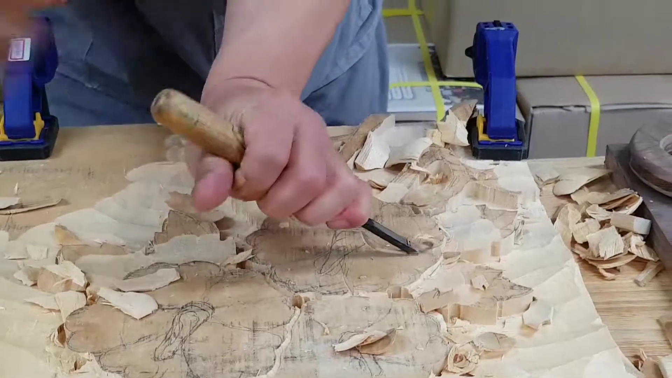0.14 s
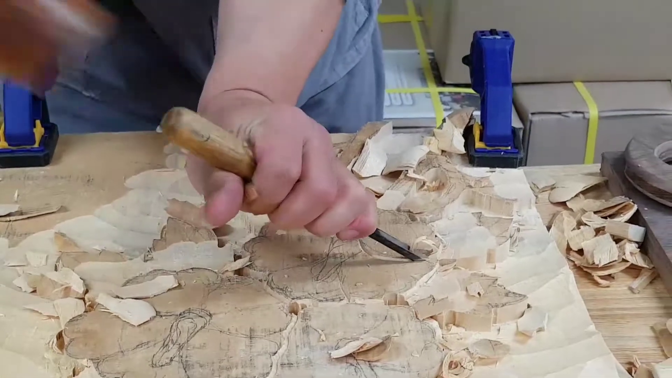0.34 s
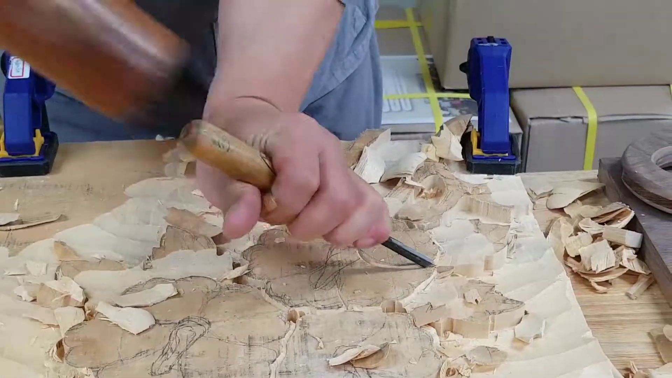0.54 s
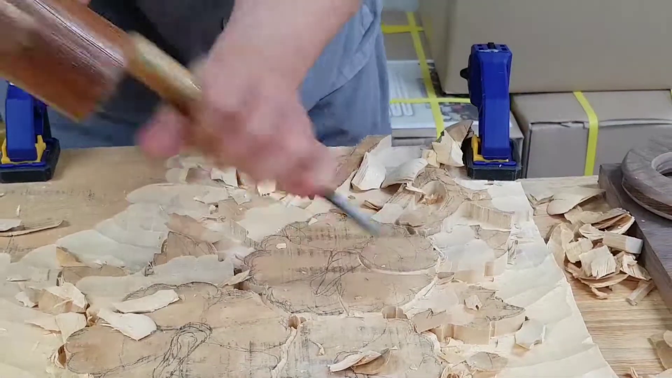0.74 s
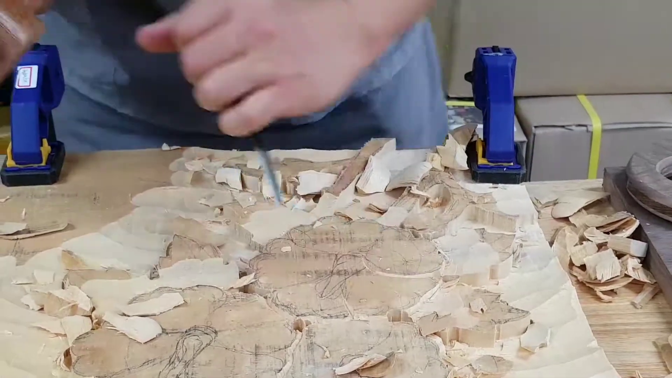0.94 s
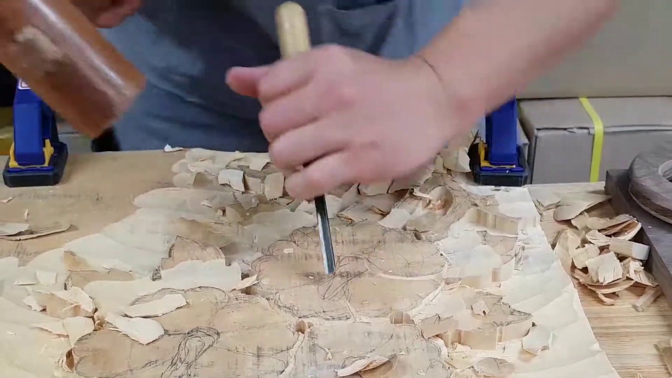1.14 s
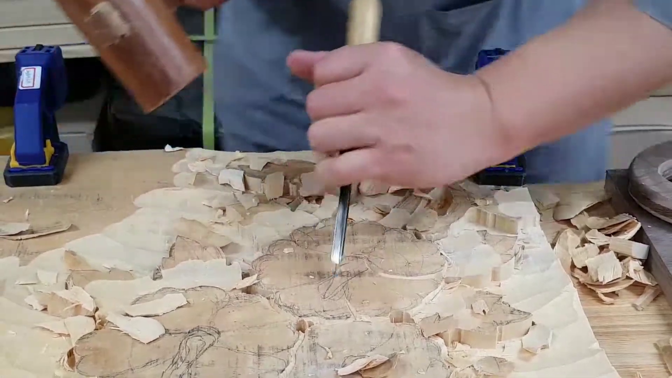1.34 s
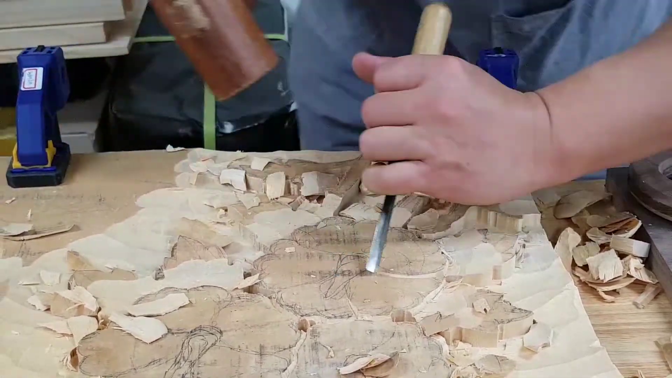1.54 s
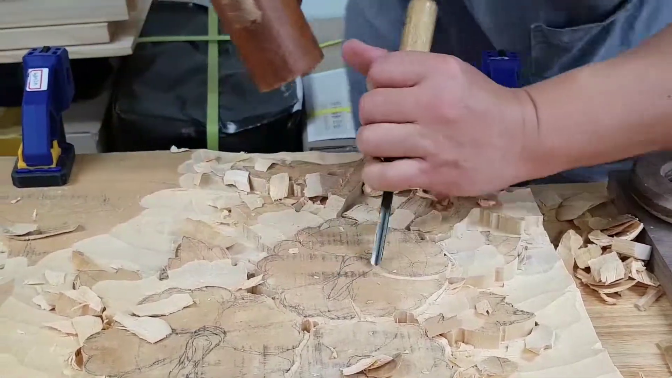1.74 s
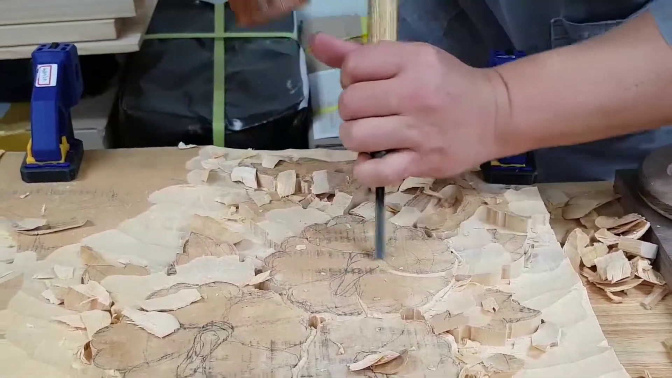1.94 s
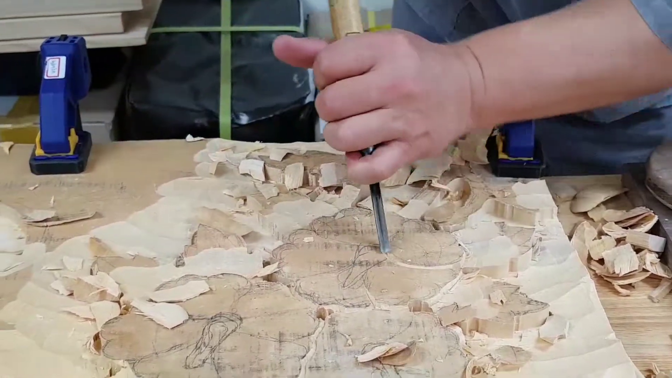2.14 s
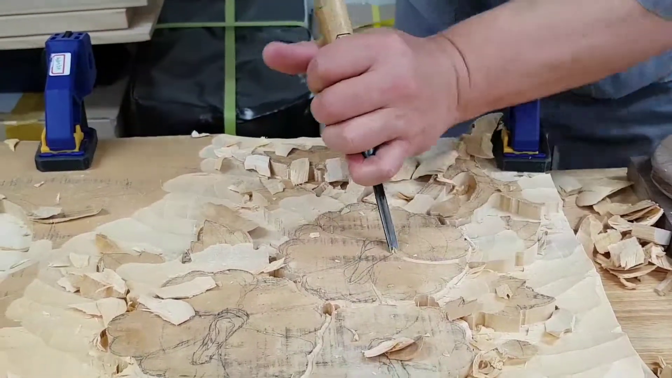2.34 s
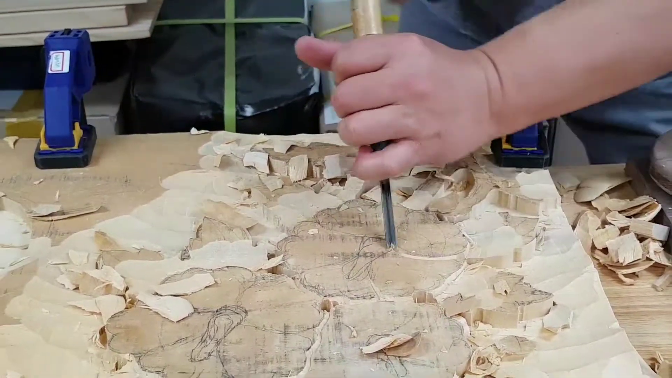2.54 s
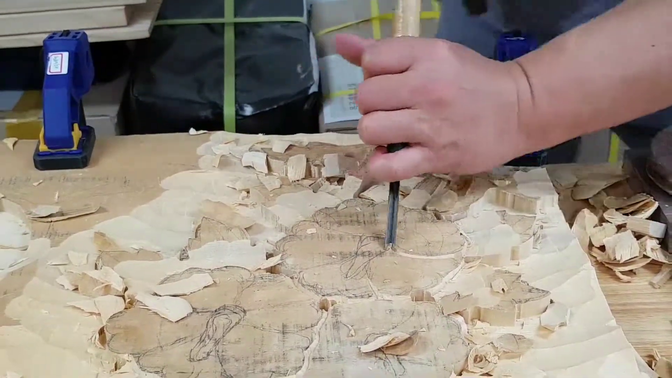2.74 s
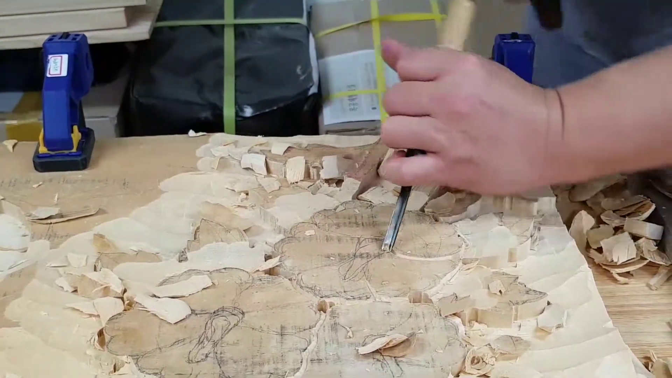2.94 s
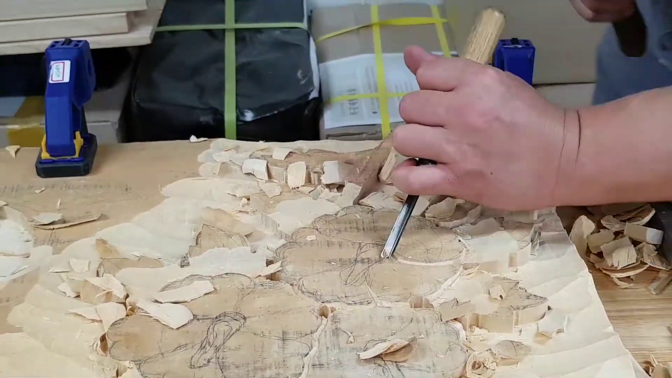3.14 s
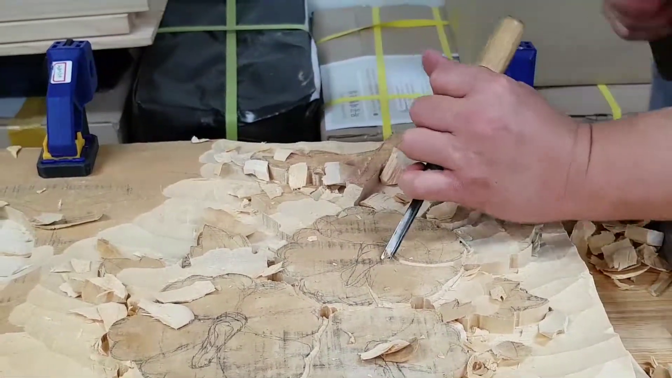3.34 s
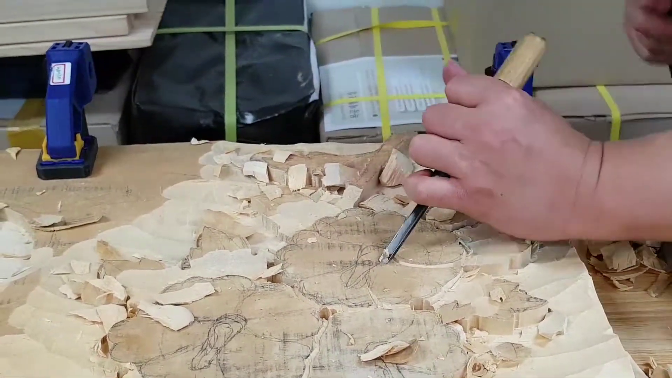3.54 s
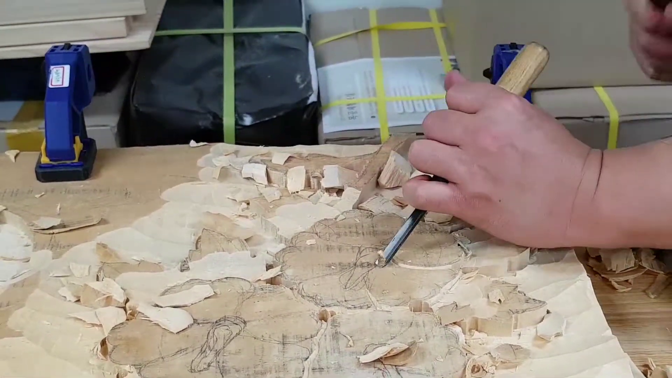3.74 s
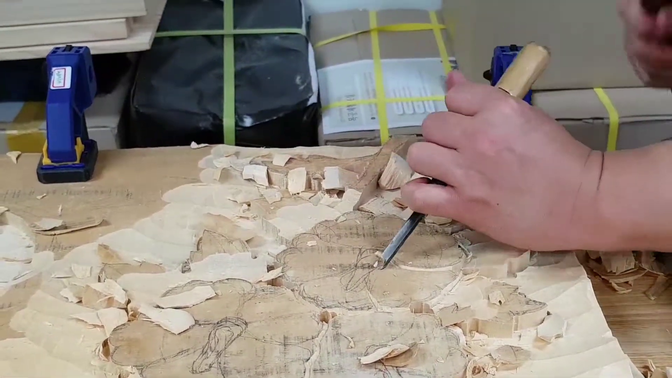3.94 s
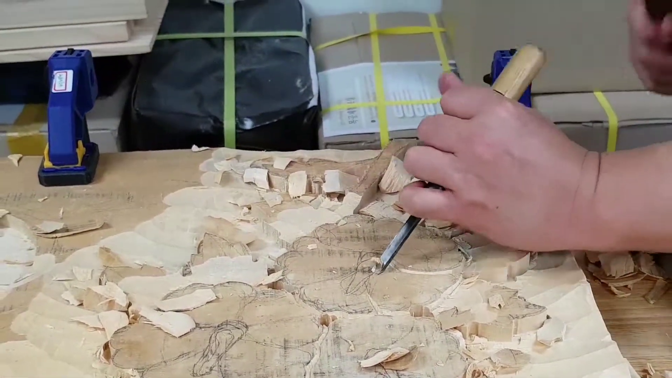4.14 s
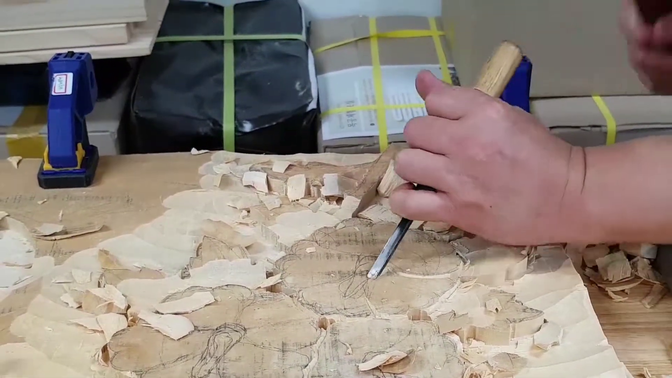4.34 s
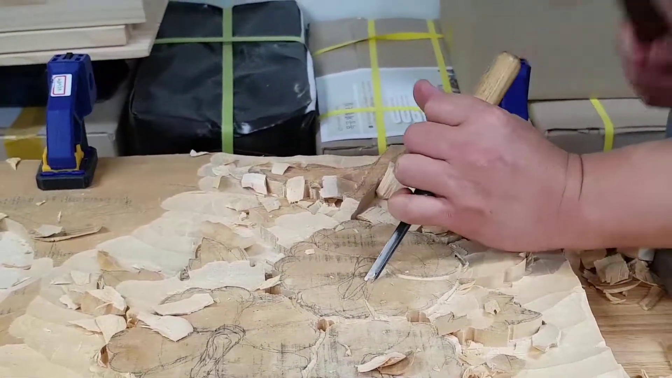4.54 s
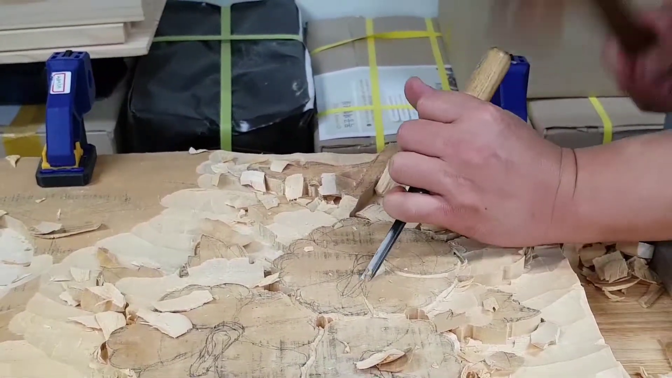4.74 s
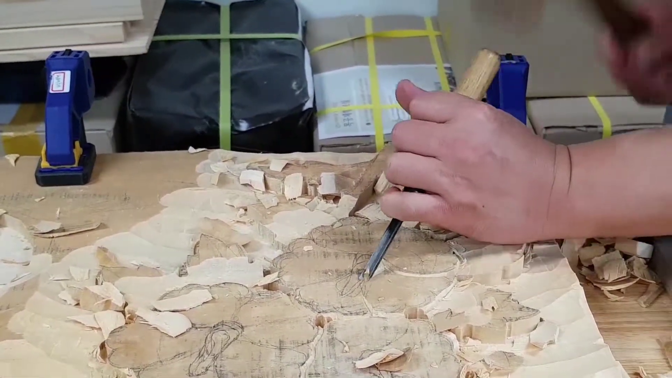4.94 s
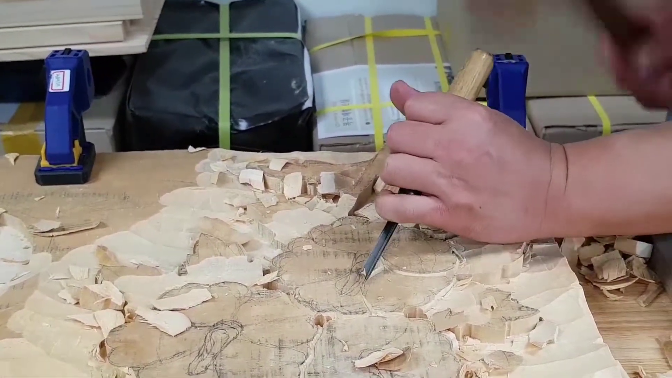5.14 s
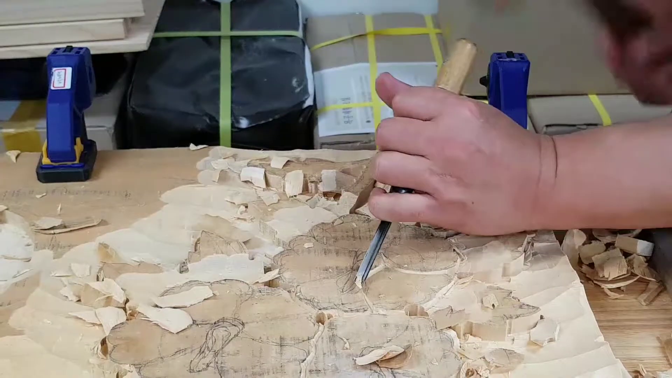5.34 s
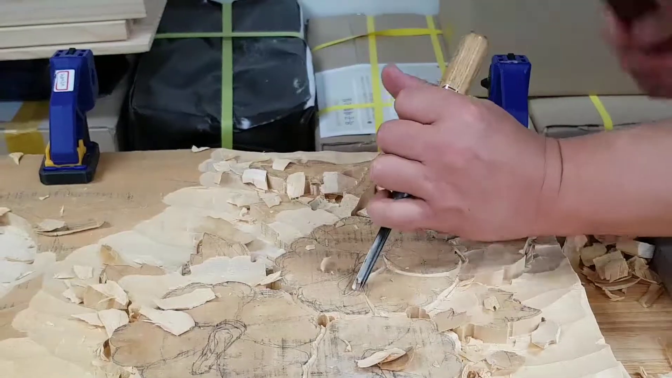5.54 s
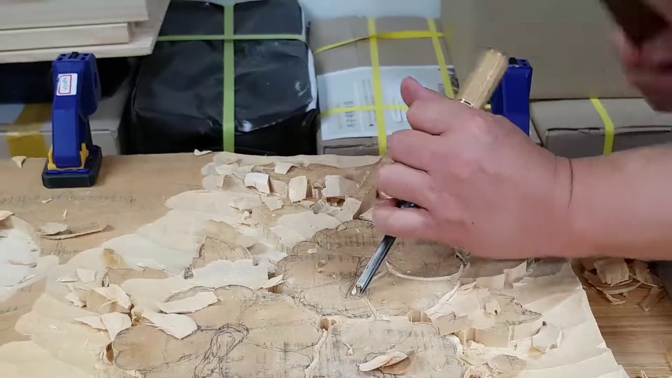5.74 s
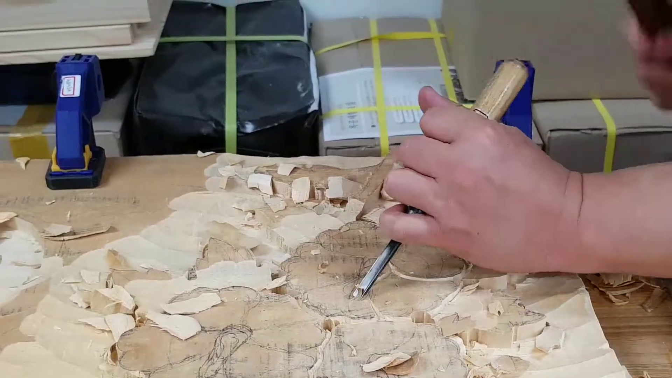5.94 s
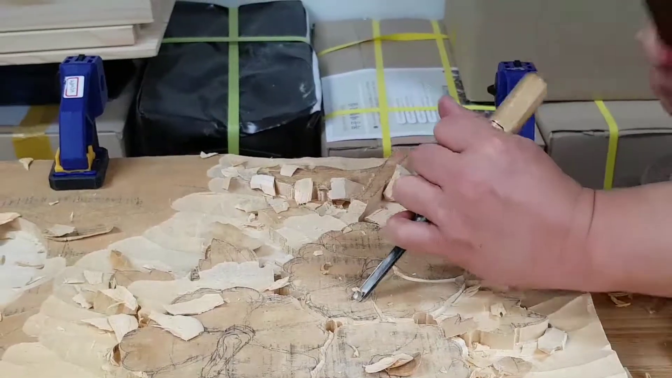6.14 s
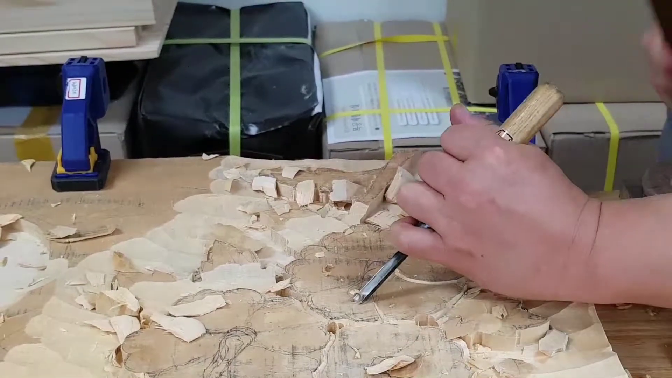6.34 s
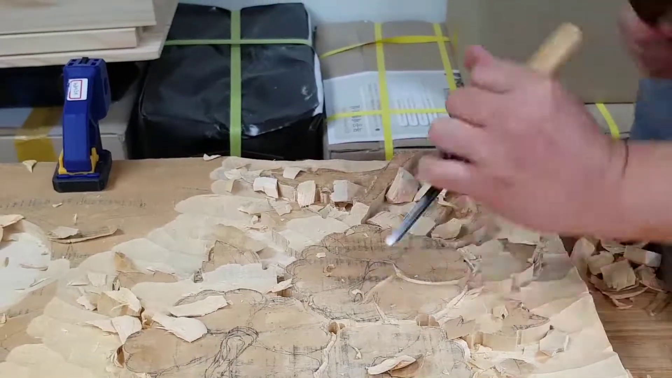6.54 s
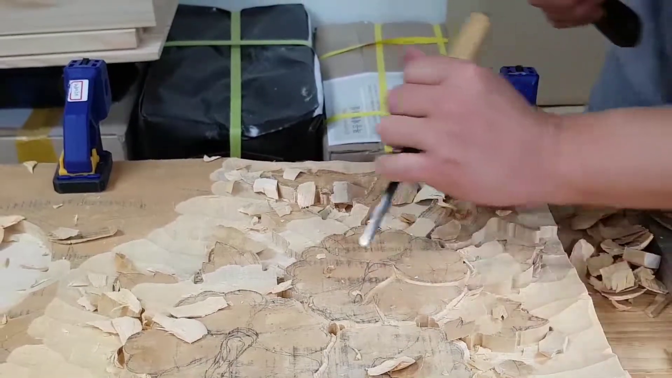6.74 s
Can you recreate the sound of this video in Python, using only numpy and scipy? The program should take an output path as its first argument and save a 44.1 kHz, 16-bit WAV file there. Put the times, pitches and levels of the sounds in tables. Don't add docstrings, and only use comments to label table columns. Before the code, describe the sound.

Three hard mallet blows, a pause with cloth brushing over wood, then a long steady run of bright chisel knocks above faint machine hum.

```python
import sys
import numpy as np
from scipy import signal
from scipy.io import wavfile
from scipy.ndimage import uniform_filter1d

SR = 44100
rng = np.random.default_rng(int(sys.argv[2]) if len(sys.argv) > 2 else 0)


def convert_level_to_amplitude(level_db):
    exponent = np.asarray(level_db, float) / 20
    return 10 ** exponent


def persist_wave(psi):
    counts = np.round(np.clip(psi, -1, 1) * 32767).astype(np.int16)
    wavfile.write(sys.argv[1], SR, np.atleast_2d(counts).T)


N = 303760


def evened(x):
    return x / np.sqrt(np.mean(x ** 2) + 1e-20)


def read(points, hz):
    f, value = np.transpose(points)
    return np.interp(np.log(hz + 1), np.log(f + 1), value)


def add(mix, s, sound):
    part = mix[..., round(s * SR):][..., :sound.shape[-1]]
    part += sound[..., :part.shape[-1]]


def lowpass(x, hz):
    return signal.sosfilt(signal.butter(1, hz, fs=SR, output="sos"), x)


# [f/Hz, left-right likeness 0..1]
COHERENCE = [(60, .995), (150, .99), (300, .92), (600, .6), (2000, .55), (5000, .25), (10000, .3)]


def correlated(left, other, same):
    return np.array([left, same * left + np.sqrt(1 - same ** 2) * other])


def noise(colour, patchy_db):
    frames, hz = N // 256 + 5, np.fft.rfftfreq(1024, 1 / SR)
    a, b, c, d, patches = rng.standard_normal((frames, 513, 5)).T
    patches = uniform_filter1d(patches, 12, 0)
    patches = evened(uniform_filter1d(patches, 12, 1))
    same = np.clip(read(COHERENCE, hz), -1, 1)[:, None]
    z = correlated(a + 1j * b, c + 1j * d, same)
    z = z * convert_level_to_amplitude(read(colour, hz)[:, None] + patchy_db * patches)
    return evened(signal.istft(z, nperseg=1024, noverlap=768)[1][:, :N])


def ring(modes, spread_db, rise, detune):
    hz, db, t60 = np.transpose(modes)[:, :, None]
    t = np.arange(int(t60.max() * SR) + 900) / SR
    share, shift, skew, start = rng.standard_normal((4, *hz.shape))
    phase = 2 * np.pi * hz * (1 + detune * shift) * t
    phase = phase + start * np.minimum(hz / 400, 2)
    lead = skew * np.arccos(np.clip(read(COHERENCE, hz), 0, 1)) / 2
    size = convert_level_to_amplitude(db + spread_db * share - 60 * t / t60) * (1 - np.exp(-t / rise))
    x = np.array([(size * np.sin(phase + lead)).sum(0), (size * np.sin(phase - lead)).sum(0)])
    return x / np.sqrt(2 * np.mean(x[:, :900] ** 2))


def split(modes, apart_hz):
    hz, db, t60 = np.repeat(np.transpose(modes), 3, axis=1)
    offset = np.tile([-1, 0, 1], len(modes)) + .4 * rng.standard_normal(len(hz))
    return np.transpose([hz + apart_hz * offset, db, t60])


def stroke(s, held, db, rise, swell, fall):
    t = np.arange(N) / SR - s
    gain_db = db + swell * np.clip(t, 0, held)
    return convert_level_to_amplitude(gain_db - rise * np.maximum(-t, 0) - fall * np.maximum(t - held, 0))


# [f/Hz, level/dB]
AIR = [(88, -46.5), (150, -6), (231, -5), (391, -12.5), (457, -7), (649, -12), (1290, -18.5), (1420, -16.5),
       (1600, -20), (2220, -19.5), (3100, -32), (16000, -54.5)]
# [f/Hz, level/dB]
RUMBLE = [(20, 9), (40, -1.5), (70, 4), (110, 7), (160, -20), (250, -46)]
# [t/s, level/dB]
BACKGROUND = [(0.0, -43.5), (0.459, -51), (.95, -53), (1.6, -51.5), (1.75, -46.5), (2.4, -47.5), (3.3, -51),
              (4.3, -61.5), (5.5, -54.5), (6.4, -60.5), (6.56, -54.5), (6.89, -54)]
HUM_HZ, HUM_DB, BACKGROUND_MID_DB = 113.4, -56.5, -51
HUM_SWING = 1.3


def machine():
    air_db = np.interp(np.arange(N) / SR, *np.transpose(BACKGROUND))
    hum_db = HUM_DB + HUM_SWING * (air_db - BACKGROUND_MID_DB)
    waver = uniform_filter1d(rng.standard_normal((2, N)), 2600)
    waver = evened(uniform_filter1d(waver, 2600))
    phase = 2 * np.pi * np.cumsum(HUM_HZ + 2.5 * waver[1]) / SR
    tone = np.sin(phase) + convert_level_to_amplitude(-10.0) * np.sin(2 * phase + waver[0])
    hum = evened((1 + 0.27 * waver[0]) * tone)
    air = convert_level_to_amplitude(air_db - 5.5) * noise(AIR, patchy_db=-1.5)
    return air + convert_level_to_amplitude(hum_db) * (hum + convert_level_to_amplitude(-2.5) * noise(RUMBLE, patchy_db=-1.0))


# [f/Hz, level/dB]
CLOTH = [(1470, -31), (2500, 0.5), (3750, -0.5), (7770, -1), (13300, -10), (15200, -13.5), (16200, -40)]
# [t/s at full speed, held t/s, level/dB]
BRUSHES = [
    (0.0, .01, -64),
    (.825, 0.082, -69.5),
    (1.095, .012, -79),
    (1.235, 0.015, -75),
    (1.325, .015, -83),
    (1.39, .05, -70),
    (1.46, 0.56, -62.5),
    (3.1, 0.31, -64),
    (6.715, 0.014, -66),
]


def sleeve():
    speed = sum(stroke(*row, rise=360, swell=11, fall=250) for row in BRUSHES)
    return convert_level_to_amplitude(2.0) * uniform_filter1d(speed, 600) * noise(CLOTH, patchy_db=1.0)


# (t/s, held t/s, level/dB)
SCRAPE = (6.632, 0.1, -67.5)
# [lower f/Hz, upper f/Hz]
SCRAPE_BAND = [1700, 2600]


def scrape():
    band = signal.butter(2, SCRAPE_BAND, "band", fs=SR, output="sos")
    rub = signal.sosfilt(band, rng.standard_normal(N))
    return stroke(*SCRAPE, rise=1800, swell=0, fall=680) * evened(rub)


# [f/Hz, t60/s]
ROOM = [(80, 0.45), (250, 0.24), (600, 0.36), (1500, 0.24), (4000, 0.21), (10000, 0.26)]
# [t/ms, level/dB]
ECHOES = [(2.4, -9), (3.5, -14), (6.4, -11), (7.9, -12), (9.0, -12), (17.5, -18)]


def room(x):
    half = SR // 2
    taps = np.zeros((2, half))
    at = np.arange(60, half - 20, 20) + rng.integers(0, 20, (2, (half - 61) // 20))
    np.put_along_axis(taps, at, rng.choice([-1., 1.], at.shape), 1)
    hz, t, z = signal.stft(taps, SR, nperseg=512)
    z = correlated(z[0], z[1], np.clip(read(COHERENCE, hz), 0, 1)[:, None])
    decay = convert_level_to_amplitude(-60 * t / read(ROOM, hz)[:, None])
    tail = signal.istft(z * decay, SR, nperseg=512)[1]
    tail = convert_level_to_amplitude(-1.5) * tail / np.linalg.norm(tail[0])
    for ms, db in ECHOES:
        tail[[0, 1], round(ms * SR / 1000) + rng.integers(-4, 5, 2)] += convert_level_to_amplitude(db)
    return signal.fftconvolve(x, tail, axes=1)[:, :N]


WALL_BASS_HZ, WALL_BASS_LOSS = 780, 0.54


def reflected(cracks, wood):
    source = cracks + convert_level_to_amplitude(-1.4) * (wood - WALL_BASS_LOSS * lowpass(wood, WALL_BASS_HZ))
    stance = .6 * np.arange(N) / SR
    wet = room(source * np.cos(stance)) + room(source * np.sin(stance))
    return convert_level_to_amplitude([[-3.], [-3.6]]) * wet


# [f/Hz, level/dB, t60/s]
STEEL = [(4150, -3, .012), (4500, -4, .012), (7450, 0, .018), (7750, -4, .012), (10300, -12, .01),
         (10900, -13, .01), (6000, -9, .005), (8900, -11, .005), (14000, -15, .004)]
# [t/s, level/dB]
CHATTER = [
    (5.957, -58),
    (5.962, -59),
    (5.970, -56),
    (5.975, -52),
    (5.983, -60),
    (5.992, -62),
    (6.000, -60),
    (6.011, -62),
]


def blade():
    out = np.zeros((2, N))
    for s, db in CHATTER:
        add(out, s, convert_level_to_amplitude(db) * ring(STEEL, spread_db=7.5, rise=0.00038, detune=0.016))
    return out


# [f/Hz, level/dB]
RATTLE = [(650, 1.5), (1000, 1), (1250, 3.5), (1600, -11.5), (2100, 5.5), (2800, 9), (3500, -15),
          (4500, -23.5)]


def dense_modes():
    hz = np.geomspace(850, 4500, num=60) * rng.uniform(0.9, 1.2, 60)
    return np.transpose([hz, read(RATTLE, hz), .05 * (1500 / hz) ** .5])


# [f/Hz, level/dB, t60/s]
BENCH = [(143.4, 2.5, 0.13), (127.8, -13, 0.22), (101.4, -10, 0.18), (62.3, -19, 0.27)]
# [f/Hz, level/dB, t60/s]
BOARD = [(207, -0.5, 0.15), (241.1, -3, 0.26), (261.6, -2.5, 0.16), (284.7, -6.5, 0.22), (326.3, -5, 0.29),
         (352.3, -6.5, 0.26)]
# [f/Hz, level/dB, t60/s]
RELIEF = [(401.2, -3, 0.18), (429.7, -2, 0.21), (455.8, -6.5, 0.21), (492, -6, 0.18), (539.4, 2, 0.14),
          (593, -3.5, 0.11), (599, -14.5, 0.047), (652.5, -9.5, 0.23), (704, 0.5, 0.087), (767, -4, 0.089),
          (867, -2, 0.049)]
BENCH_DB, TOUCH_BENCH_DB = -1.16, -6.5


def answer(wood, s, row, dense, splinter_db):
    _, db, board_db, relief_db, tilt_db = row
    bench_db = board_db + (BENCH_DB if db > -20 else TOUCH_BENCH_DB)
    board, relief = split(BOARD, apart_hz=12), split(RELIEF, apart_hz=15)
    knock = dense + tilt_db * np.log2(dense[:, :1] / 1800) * [0, 1, 0]
    add(wood, s, convert_level_to_amplitude(db + bench_db + 4.0) * ring(BENCH, spread_db=1.5, rise=0.0012, detune=0.013))
    add(wood, s, convert_level_to_amplitude(db + board_db + 1.5) * ring(board, spread_db=0.5, rise=0.0035, detune=0.0044))
    add(wood, s, convert_level_to_amplitude(db + relief_db + 2.0) * ring(relief, spread_db=0.8, rise=0.0062, detune=.01))
    add(wood, s, convert_level_to_amplitude(db - 22.5) * ring(knock, spread_db=1.0, rise=0.0068, detune=0.035))
    steel = ring(STEEL, spread_db=5.5, rise=.0005, detune=0.069)
    add(wood, s, convert_level_to_amplitude(db + splinter_db - 27.5) * steel)


# [t/s, pitch factor]
LANDING = [(.08, 1.04), (.5, 0.97), (2.36, 0.92), (2.6, 1.1), (3.0, 1.02), (3.6, 1.036), (4.2, 1.03),
           (4.8, 1.034), (5.1, 1.01), (5.4, 0.96), (5.62, 0.89), (5.9, 1.03), (6.42, 1.05)]


def crack(s, tilt_db, head, ms, splinter_db, torn):
    hz, head_db = np.transpose(head)[:, :, None]
    share, shift = rng.standard_normal((2, *hz.shape))
    t = np.arange(500) / SR
    u = t * 1000 / ms
    pitch = np.interp(s, *np.transpose(LANDING)) + 0.016 * shift
    level = convert_level_to_amplitude(head_db + tilt_db * np.log2(hz / 1800) + share)
    tones = level * np.sin(2 * np.pi * hz * pitch * (t - .00045))
    pulse = u ** 2 * np.exp(-u) * tones.sum(0)
    pulse = pulse / abs(pulse).max()
    edge = np.exp(-u / 6) * (1 - np.exp(-u)) * torn[0, -500:]
    return pulse + convert_level_to_amplitude(splinter_db + 3) * edge


# [t/s, tearing level/dB above the crack, top of tearing f/Hz, contact
# t/ms]
TEARING = [(.08, -23.5, 12400, 0.24), (.5, -19.5, 13350, 0.24), (2.0, -41, 11800, .24),
           (2.36, -22.5, 6200, 0.23), (2.6, -26, 6500, 0.14), (2.9, -24.5, 7500, 0.18),
           (3.3, -26, 12500, 0.15), (3.7, -29, 10500, 0.21), (4.4, -23.5, 9200, 0.23), (4.7, -29, 9000, 0.26),
           (5.0, -26.5, 8960, .22), (5.4, -22.5, 9800, 0.29), (5.8, -28.5, 8000, 0.18),
           (6.1, -25.5, 9600, 0.18), (6.42, -26.5, 9150, 0.16), (6.87, -37.5, 9000, 0.2)]


def blows(rows, head, dense, fibres):
    cracks, wood = np.zeros(N), np.zeros((2, N))
    t = np.arange(11000) / SR
    when, *manner = np.transpose(TEARING)
    for row in rows:
        s, db, _, _, tilt_db = row
        splinter_db, top_hz, ms = (np.interp(s, when, column) for column in manner)
        torn = lowpass(np.roll(fibres, -round(s * SR), axis=1)[:, :len(t)], top_hz)
        pulse = crack(s, tilt_db, head, ms, splinter_db, torn)
        add(cracks, s + 0.00033, convert_level_to_amplitude(db + 2.5) * pulse)
        later = s + 0.000906
        answer(wood, later, row, dense, splinter_db)
        tear = convert_level_to_amplitude(-60 * t / 0.025) + convert_level_to_amplitude(-1.0 - 60 * t / 0.23)
        add(wood, later, convert_level_to_amplitude(db + splinter_db - 2.5) * tear * torn)
    return cracks, wood


# [f/Hz, level/dB]
SPLINTER = [(2060, -21), (3500, -2), (5570, -9), (7000, -10.5), (8000, -12.5), (8860, -16.5), (12700, -21),
            (16000, -38.5)]
# [f/Hz, level/dB]
HEAD_LEFT = [(2950, 7.5), (1524, 7), (3330, -6.5)]
# [f/Hz, level/dB]
HEAD_FRONT = [(2040, -4), (1530, 1), (3074, -2)]
# [t/s, crack level/dB, drive into board and bench level/dB above the crack,
# carved face level/dB above the crack, tilt of the knock/dB per octave]
LEFT_BLOWS = [
    (0.0797, 0, -19, -18, -4),
    (0.2848, 0, -20.5, -17, -6.5),
    (0.5051, -2, -21, -17, -5),
]
# [t/s, crack level/dB, drive level/dB, face level/dB, tilt/dB per octave]
FRONT_BLOWS = [(2.3644, 2, -19.5, -23, 0), (2.5933, 2, -19, -26.5, -1.7), (2.8117, 0.5, -19, -17, -4),
               (3.0274, -3, -21, -33, -3), (3.2382, -1, -18.5, -24, -4), (3.4384, -1, -18, -21, -2.5),
               (3.633, -1.5, -22, -28.5, -1), (3.8274, -1.5, -25, -31, -3), (4.0227, -4, -23, -27.5, -.5),
               (4.2211, -5, -19.5, -25, .5), (4.419, -6, -17, -21, -3.5), (4.6085, -4, -19, -22, -4),
               (4.795, -2, -23.5, -26.5, 1.5), (4.9982, -0.5, -25.5, -29.5, 1), (5.1972, -4, -22, -27, 2),
               (5.4012, -3, -23, -26, 2.5), (5.6154, -4.5, -16, -22.5, -2.5),
               (5.8129, -2.5, -18.5, -22, -6), (6.0194, -0.5, -23, -30.5, 0),
               (6.2226, -3.5, -19.5, -21, -1.3), (6.4176, -4.5, -17, -17, -11)]
# [t/s, crack level/dB, drive level/dB, face level/dB, tilt/dB per octave]
TOUCHES = [
    (1.642, -45, -5, -6, -10),
    (2, -36.5, -11.5, -11.5, -12),
    (6.8707, -39, -9, -4.5, -3),
]


def scene():
    dense, fibres = dense_modes(), noise(SPLINTER, patchy_db=2)
    left_crack, left_wood = blows(LEFT_BLOWS, HEAD_LEFT, dense, fibres)
    front_crack, wood = blows(FRONT_BLOWS + TOUCHES, HEAD_FRONT, dense, fibres)
    wood = wood + left_wood + blade()
    late = convert_level_to_amplitude(-4) * np.roll(left_crack, 11)
    direct = front_crack + wood + np.array([convert_level_to_amplitude(3) * left_crack, late])
    wet = reflected(front_crack + left_crack, wood)
    return direct + wet + machine() + sleeve() + scrape()


def roll_off(x):
    return signal.sosfilt(signal.butter(12, 16880, fs=SR, output="sos"), x)


MIC_HZ, EDGE_HZ = 83, 16450
CEILING = .96


def record(dry):
    thin = signal.sosfilt(signal.butter(2, MIC_HZ, "high", fs=SR, output="sos"), dry)
    held = CEILING * np.tanh(thin * convert_level_to_amplitude(2.5) / CEILING)
    held = signal.oaconvolve(held, signal.firwin(255, EDGE_HZ, fs=SR)[None], "same")
    return roll_off(held)


dry = scene()
out = record(dry)
persist_wave(out)
```